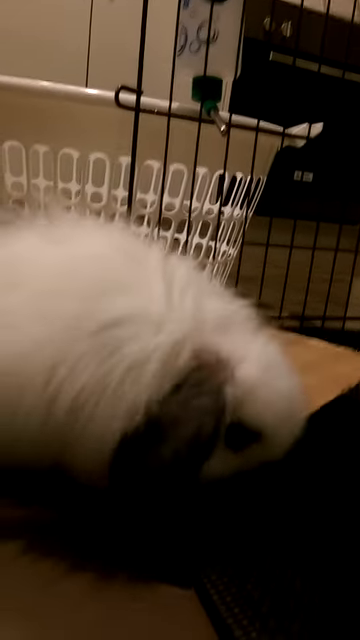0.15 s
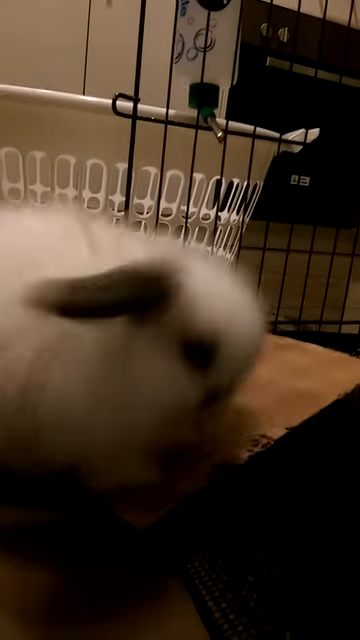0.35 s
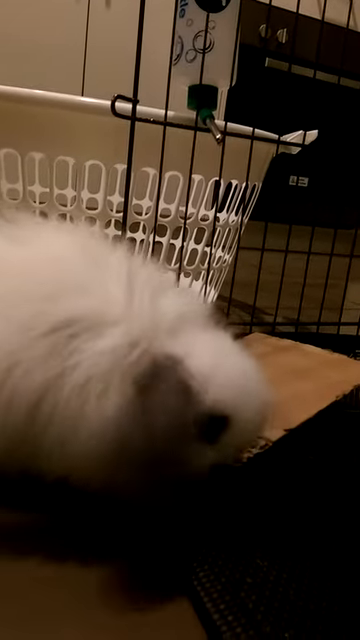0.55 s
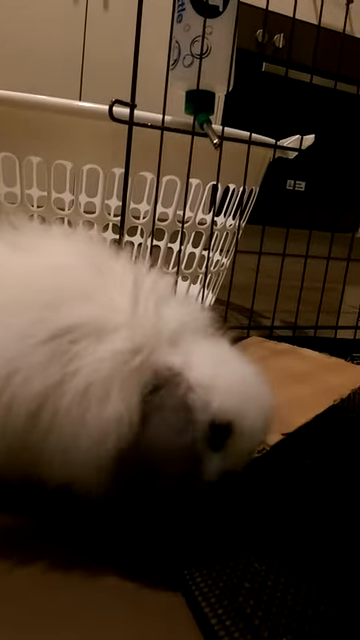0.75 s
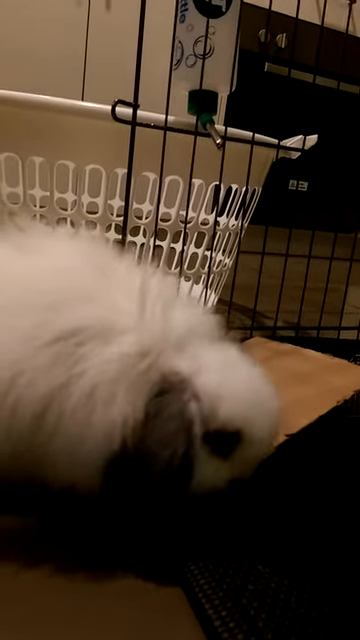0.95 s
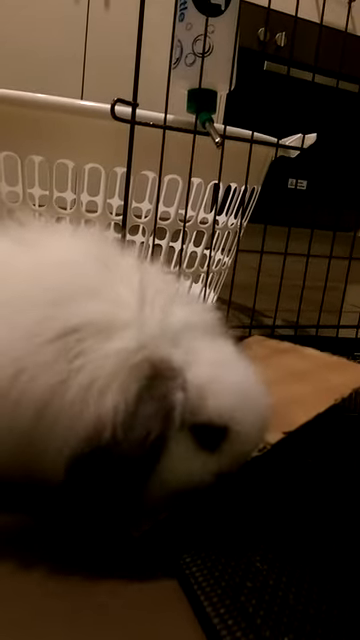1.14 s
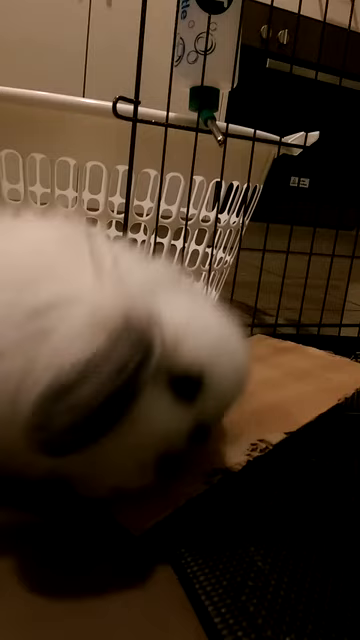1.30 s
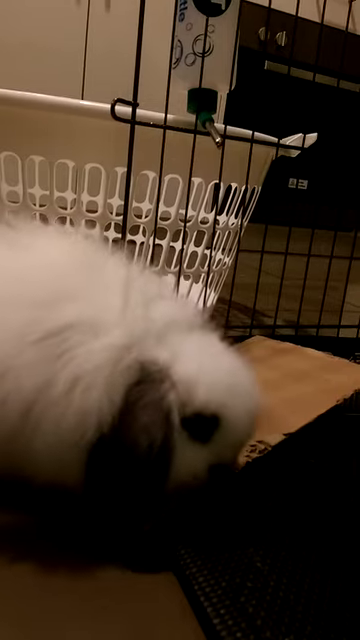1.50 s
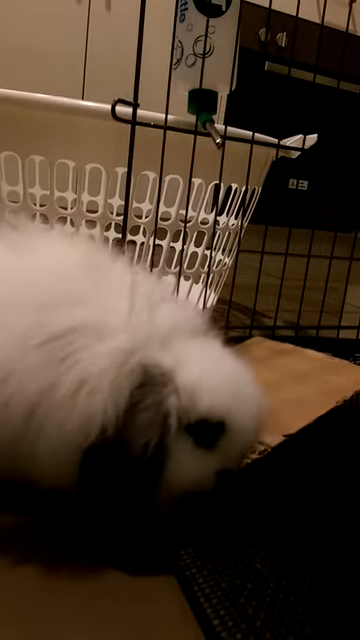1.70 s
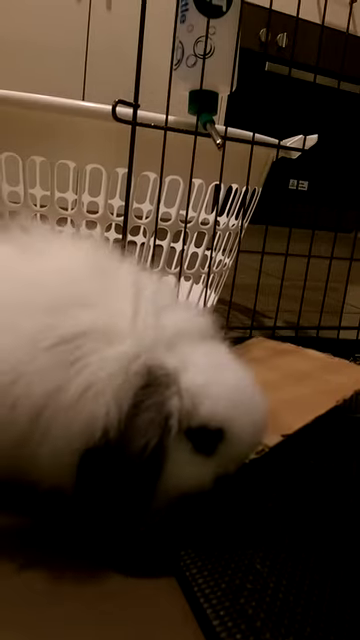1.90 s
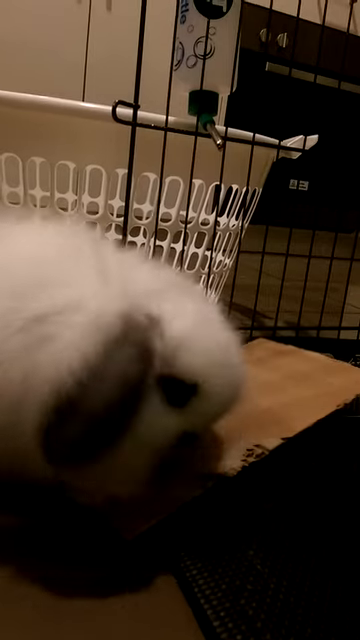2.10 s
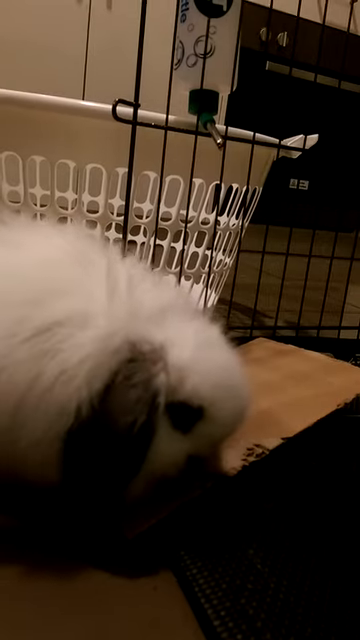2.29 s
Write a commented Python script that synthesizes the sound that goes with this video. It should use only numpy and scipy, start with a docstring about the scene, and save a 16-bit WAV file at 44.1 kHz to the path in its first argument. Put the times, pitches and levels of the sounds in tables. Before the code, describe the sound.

A rabbit gnaws cardboard close by, with a few sharp crunches, snaps and a rip.

```python
"""A rabbit gnaws and tugs at a sheet of cardboard, close by in an indoor pen.
Each bite is a small crunch of fibres, then a pull: twice the card snaps free, the third time it rips.
Snaps, tears and scuffs all ring the same damped sheet; the teeth tick between bites.
The pen and a small room ring on over faint rumble, hiss and a low hum."""
import sys
import numpy as np
from scipy import signal
from scipy.fft import rfft, irfft
from scipy.io import wavfile

SR = 44100
rng = np.random.default_rng(int(sys.argv[2]) if len(sys.argv) > 2 else 0)


def master(y):
    """Save y as 16-bit WAV."""
    cut = np.clip(np.atleast_2d(y).T, -1, 1)
    pcm = np.round(cut * 32767)  # scale
    wavfile.write(sys.argv[1], SR, pcm.astype(np.int16))


N = 103635
HZ = np.fft.rfftfreq(8192, 1 / SR)  # filter design grid
BAND_EDGE_HZ = 16050

# t/s, knock f/Hz, knock boost/dB, 6 x level/dB at CLICK_BANDS_HZ
SNAPS = [(.1260, 1090, 7, -25, -15.5, -13, -13, -4.5, -10), (.2428, 301.5, 1, 7, 9.5, 7, 13, -1, 0.5),
         (1.2185, 674, 2.5, 10.5, 11.5, 8.5, 3, 9.5, -10), (2.0562, 860, 3.5, -5.5, -2, -6, -8, -4, -6),
         (2.0604, 865, 6.5, -16.5, -10, -9, -7.5, -2.5, -2)]
# t/s, length/s, swell/dB, knock f/Hz, knock boost/dB, 6 x level/dB at CLICK_BANDS_HZ
TEARS = [(0.109, 0.042, -14, 1140, 4.5, -51, -16.5, -31, -16.5, -10, -17),
         (0.137, 0.012, -5, 1110, 13, -38, -25, -14.5, -14, -15, -14),
         (.2404, .0022, 3.5, 4300, 8, -6, -17, 5, -16, 7.5, -8),
         (0.362, .03, 1, 4300, 3, -38, -32, -21, -32.5, -24, -20),
         (1.1077, .012, -3, 3655, 10.5, -25, -15.5, -17.5, -18, -17, -15.5),
         (1.12, 0.0093, -1.5, 3990, 4, -15.5, -12, -9, -4, -7, -6.5),
         (1.213, .005, 0, 3440, 6, -26.5, -21, -14, -10, -12, -20.5),
         (1.925, 0.026, 4, 4300, -4.5, -30.5, -29, -25.5, -22.5, -17.5, -23),
         (2.0292, 0.0077, 13, 3700, 0, -20, -23, -12, -6, -12.5, -19.5),
         (2.0365, 0.022, 3.5, 293, 3.5, 4, 3, 3.5, 0.5, 2, 3.5)]
# t/s, length/s, level/dB
SCUFFS = [(0.033, 0.011, -35), (0.07, 0.0062, -31), (.844, 0.0084, -26.5), (0.857, 0.0097, -25),
          (0.994, .007, -28), (1.062, 0.0059, -33)]
# 6 x gain/dB at CLICK_BANDS_HZ
SCUFF_EQ = [0, 1, -2.5, -1, -9.5, -8]


def cardboard():
    """Single breaks (snaps) and runs of breaks (tears, soft scuffs) drive the sheet."""
    force = np.zeros(N)
    for start_s, knock_hz, knock_db, *bands_db in SNAPS:
        add(force, start_s, click(bands_db, knock_hz, knock_db))
    for start_s, length_s, swell_db, knock_hz, knock_db, *bands_db in TEARS:
        tear = signal.fftconvolve(fibres(length_s, swell_db), click(bands_db, knock_hz, knock_db))
        add(force, start_s, tear)
    for start_s, length_s, level_db in SCUFFS:
        scuff = signal.fftconvolve(fibres(length_s, swell_db=0), click(SCUFF_EQ))
        add(force, start_s, amp(level_db) * scuff)
    return signal.fftconvolve(force, sheet())[:N]


# f/Hz of bass, middle, upper middle, presence, treble, top
CLICK_BANDS_HZ = [350, 1000, 1900, 3800, 9000, 12500]


def click(bands_db, knock_hz=1000, knock_db=0):
    """One break in the card; the bitten spot favours one pitch, the knock."""
    relative_width = 0.094
    knock = (amp(knock_db) ** 2 - 1) / (1 + (2 * (HZ / knock_hz - 1) / relative_width) ** 2)
    spectrum = amp(curves(list(zip(CLICK_BANDS_HZ, bands_db)), HZ)[0])
    return min_phase(spectrum * np.sqrt(1 + knock))


def fibres(length_s, swell_db):
    """Fibres give way in a run of impulses of uneven size and spacing, total energy 1."""
    breaks_per_s, spread_db = 3600, 5
    jitter, size_draw, sign_draw = rng.random((3, 256))
    break_s = (np.arange(len(jitter)) + jitter) / breaks_per_s
    size_db = spread_db * np.minimum(-np.log(1 - size_draw), 3)
    ramp_db = swell_db * np.minimum(break_s / length_s, 1)
    impulses = amp(size_db + ramp_db) * np.sign(sign_draw - .5)
    inside = break_s < length_s
    run = np.zeros(int(length_s * SR) + 1)
    run[(break_s[inside] * SR).astype(int)] = impulses[inside]
    return run / (np.linalg.norm(run) + 1e-12)


CARD_LOW_HZ, CARD_TOP_HZ, CARD_FLAT_DB = 140, 14800, -20
# f/Hz, width/Hz, level/dB
CARD_MODES = [(301, 72, 9), (424, 37, 5), (546.6, 34, 11.5), (843, 78, 11.5), (1040, 100, 5),
              (1300, 110, 4), (1560, 110, 4.5), (1810, 110, 6.5), (2910, 400, 6.5), (3720, 380, 5.5),
              (4475, 320, 8.5), (6400, 900, -1.5), (7900, 430, 2.5), (10000, 2900, 5.5),
              (14000, 2500, -10.5)]


def sheet():
    """Damped impulse response of the card; treble leads bass as the crack runs and the sheet bends."""
    bend_at_1khz_s, crack_run_s = .0005, .0005
    power = sum(amp(db) ** 2 / (1 + (2 * (HZ - hz) / width) ** 2) for hz, width, db in CARD_MODES)
    power = (power + amp(CARD_FLAT_DB) ** 2) / (1 + (HZ / CARD_TOP_HZ) ** 20)
    low_cut = HZ ** 2 / (HZ ** 2 + CARD_LOW_HZ ** 2)
    response = min_phase(np.sqrt(power) * low_cut)
    bend_s = bend_at_1khz_s * np.sqrt(1000 / (HZ + 20))
    crack_s = crack_run_s * np.maximum(1 - HZ / BAND_EDGE_HZ, 0)
    dispersion = np.exp(-2j * np.pi * np.cumsum(bend_s + crack_s) * HZ[1])
    return irfft(rfft(response, 2 * len(HZ) - 2) * dispersion)[:len(HZ)]


# t/s, level/dB, f/Hz
TOOTH_TICKS = [(0.0714, -29, 10000), (0.1023, -28, 9000), (.454, -27.5, 10000), (.9022, -18, 10400),
               (1.034, -28, 10500), (1.0416, -29.5, 10500), (1.047, -27, 10500), (1.9875, -17.5, 7420),
               (1.9900, -16.5, 8200), (2.2792, -15, 7450)]


def teeth():
    """Thin, bright clicks of the teeth: one spectral peak on a flat base."""
    width_octaves, base_gain = .2, .1
    top_loss = np.sqrt(1 + (HZ / CARD_TOP_HZ) ** 20)
    out = np.zeros(N)
    for start_s, level_db, hz in TOOTH_TICKS:
        peak = np.exp(-.5 * (np.log2((HZ + 1) / hz) / width_octaves) ** 2)
        add(out, start_s, amp(level_db) * min_phase((peak + base_gain) / top_loss))
    return out


# f/Hz, right minus left/dB
RIGHT_EAR_EQ = [(200, 1), (350, 4), (560, -3.5), (1000, 5), (1800, 0.5), (2700, -15), (4400, -4),
                (6500, -15), (10000, -17.5), (12500, -5.5), (14500, 5)]
# left list, right list: delay/s, gain
BOUNCES = [
    [(.0011, 0.1), (.0029, 0.44)],
    [(.0015, 0.45), (.0039, 0.12)],
]


def direct_and_bounces(gnaw):
    """Direct sound at each ear plus its first, duller bounces off floor and pen."""
    dull_hz = 1780
    right = signal.fftconvolve(gnaw, min_phase(amp(curves(RIGHT_EAR_EQ, HZ)[0])))[:N]
    ears = []
    for direct, bounces in zip([gnaw, right], BOUNCES):
        dull = signal.lfilter(*signal.butter(1, dull_hz, fs=SR), direct)
        ears.append(direct + sum(gain * np.roll(dull, round(s * SR)) for s, gain in bounces))
    return np.array(ears)


# f/Hz, left/dB, right/dB
SCATTER_EQ = [(150, -13.5, -6), (800, -15, -8), (2000, -16, -2), (4000, -12, -0.5), (9000, -4.5, -21.5),
              (14500, -3, -3.5)]
# f/Hz, left/dB, right/dB
ROOM_EQ = [(103, 5, 14), (260, -7.5, -5), (560, -8, -1.5), (900, -6, -6.5), (1490, -2.5, 4), (2300, 0, 0),
           (3240, -5, -4.5), (4300, -12, -10.5), (6000, -3.5, -6.5), (8300, -3.5, -16), (11000, -6, -14),
           (15000, -8, -2.5)]
# f/Hz, T60/s
ROOM_DECAY = [(150, .42), (500, 0.32), (1000, .34), (2000, .39), (4000, .33), (8000, .34), (15000, 0.21)]


def reflections(source):
    """Scatter off floor and pen, then the room's tail; each bite gets its own random tail."""
    bite_boundaries_s, scatter_t60_s = [.7, 1.7], 0.024
    bite_index = np.searchsorted(bite_boundaries_s, np.arange(N) / SR)
    out = np.zeros((2, N))
    for k in np.unique(bite_index):
        bite = source * (bite_index == k)
        scatter = tail(SCATTER_EQ, [(1000, scatter_t60_s)], delay_s=.0004, build_s=.0003)
        room = tail(ROOM_EQ, ROOM_DECAY, delay_s=.003, build_s=.004)
        out += convolve_stereo(bite, scatter) + convolve_stereo(bite, room)
    return out


# f/Hz, left-right correlation
TAIL_CORRELATION = [(200, 1), (450, 0.19), (900, .3), (2000, 0), (12000, 0.13)]


def tail(eq, decay, delay_s, build_s):
    """Stereo response of dense random reflections, each band dying at its T60."""
    hz, t, noise = signal.stft(rng.choice([-1., 1.], (2, SR // 2)), SR, nperseg=128)
    noise = correlated_pair(*noise, curves(TAIL_CORRELATION, hz)[0][:, None])
    fade = amp(-60 * t / curves(decay, hz)[0][:, None])
    fade /= np.sqrt((fade ** 2).sum(1, keepdims=True) * t[1] * SR)  # equal energy per band
    ears = signal.istft(noise * fade, SR)[1]
    ears *= 1 - np.exp(-np.arange(ears.shape[1]) / SR / build_s)
    ears = [signal.fftconvolve(ear, min_phase(amp(db))) for ear, db in zip(ears, curves(eq, HZ))]
    return np.pad(ears, ((0, 0), (round(delay_s * SR), 0)))


# f/Hz, level/dB, T60/s
PEN_MODES = [(128.9, -58.5, 0.33), (305, -53.5, 0.11), (369.3, -54, .27), (550.7, -62, 0.37),
             (1063, -54, 0.16), (1262, -57.5, 0.5), (1546, -58.5, 0.3), (1720, -52, .33), (1930, -51.5, .3),
             (1948, -58, 0.281), (2960, -56.5, .28)]


def pen(gnaw):
    """Modes of the pen outlast each bite, slightly out of phase between the ears."""
    ear_spread_s = 0.00045
    t = np.arange(SR // 2) / SR
    ring = np.zeros((2, len(t)))
    for hz, level_db, t60_s in PEN_MODES:
        cycles = hz * t + rng.random() + rng.uniform(-1, 1, (2, 1)) * hz * ear_spread_s
        ring += amp(level_db - 60 * t / t60_s) * np.sin(2 * np.pi * cycles)
    return convolve_stereo(gnaw, ring)


# f/Hz, relative density/dB
NOISE_SPECTRUM = [(20, -15.5), (28, -9.5), (39, 4), (52, -3.5), (80, -0.5), (110, -5), (160, -5),
                  (220, -10.5), (300, -15.5), (450, -19.5), (700, -22), (1200, -25.5), (3000, -29.5),
                  (6000, -31), (10000, -31.5), (13000, -32), (15500, -35)]
# f/Hz, left minus right/dB
NOISE_BALANCE = [(100, 1), (500, -4), (2000, 5), (5000, 1.5), (9000, 8), (14000, 4.5)]
# f/Hz, left-right correlation
NOISE_CORRELATION = [(50, 0.99), (300, 0.77), (1000, 0.17), (3000, .2), (12000, .1)]


def room_noise(rms_db=-57.5):
    """Low rumble, alike in both ears, under a faint, wide hiss."""
    hz = np.fft.rfftfreq(N, 1 / SR)
    white = correlated_pair(*rfft(rng.standard_normal((2, N))), curves(NOISE_CORRELATION, hz)[0])
    shape_db = curves(NOISE_SPECTRUM, hz) + curves(NOISE_BALANCE, hz) * [[.5], [-.5]]
    return amp(rms_db) * unit_rms(irfft(white * amp(shape_db), N))


# f/Hz, rms level/dB
HUM_LINES = [(39, -61), (79.5, -65.5), (156.1, -72), (242.2, -71.5), (344.5, -74.5), (495.3, -77)]


def hum(waver_depth=.4, waver_hz=4):
    """Low tones, each wavering at random in level and phase."""
    t, hz = np.arange(N) / SR, np.fft.rfftfreq(N, 1 / SR)
    slow_band = np.pad(np.exp(-(hz / waver_hz) ** 2), (0, N - len(hz)))
    out = np.zeros(N)
    for line_hz, level_db in HUM_LINES:
        waver = unit_rms(np.fft.ifft(np.fft.fft(rng.standard_normal(N)) * slow_band))
        carrier = np.exp(2j * np.pi * (line_hz * t + rng.random()))
        out += amp(level_db) * unit_rms(((1 + waver_depth * waver) * carrier).real)
    return out


def amp(db):
    """Decibels to gain."""
    return 10 ** (np.asarray(db) / 20)


def unit_rms(x):
    """Scales to rms 1."""
    return x / np.sqrt(np.mean(abs(x) ** 2) + 1e-20)


def curves(table, hz):
    """Interpolates each value column over log frequency."""
    table_hz, *columns = np.transpose(table)
    return np.array([np.interp(np.log(hz + 1), np.log(table_hz + 1), c) for c in columns])


def add(mix, start_s, sound):
    """Mixes a sound in place."""
    part = mix[round(start_s * SR):][:len(sound)]
    part += sound[:len(part)]


def min_phase(gain):
    """Minimum-phase impulse response for a gain over HZ."""
    log_gain = np.log(np.maximum(gain, 1e-5))
    mirrored = np.concatenate([log_gain, log_gain[-2:0:-1]])
    return np.fft.ifft(np.exp(np.conj(signal.hilbert(mirrored)))).real[:len(HZ)]


def correlated_pair(left, other, correlation):
    """Left and right from two independent noises."""
    return np.array([left, correlation * left + np.sqrt(1 - correlation ** 2) * other])


def convolve_stereo(mono, responses):
    """Sends a sound down a left and a right path."""
    return signal.fftconvolve(mono[None], responses, axes=1)[:, :N]


def scene():
    """The gnawing arrives directly, off the pen and through the room, over noise and hum."""
    tick_send_db = -4.5
    card, ticks = cardboard(), teeth()
    gnaw = card + ticks
    reverb = reflections(card + amp(tick_send_db) * ticks)
    return direct_and_bounces(gnaw) + reverb + pen(gnaw) + room_noise() + hum()


def record(dry):
    """Soft peak limiter, then low-pass."""
    ceiling = .85
    limited = dry / (1 + (dry / ceiling) ** 6) ** (1 / 6)
    low_pass = signal.firwin(255, BAND_EDGE_HZ, window=("kaiser", 8), fs=SR)
    return signal.oaconvolve(limited, low_pass[None], "same")


dry = scene()
out = record(dry)
master(out)
```